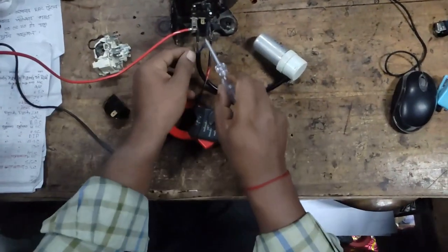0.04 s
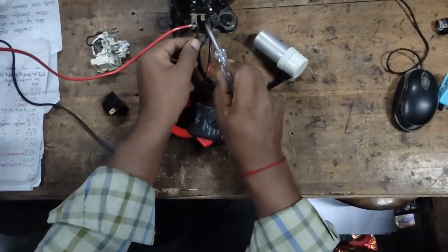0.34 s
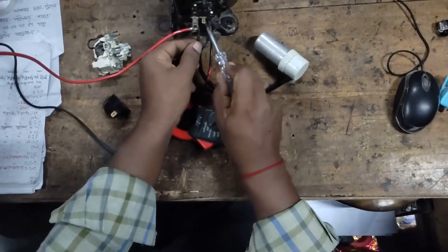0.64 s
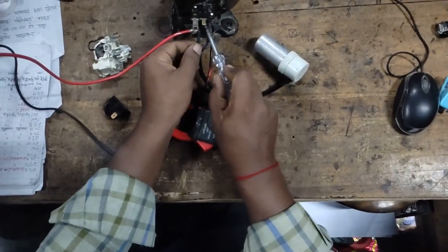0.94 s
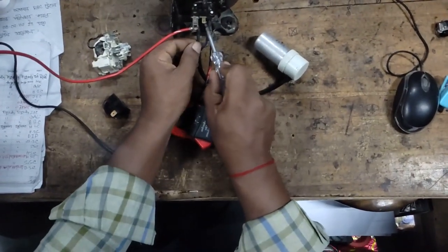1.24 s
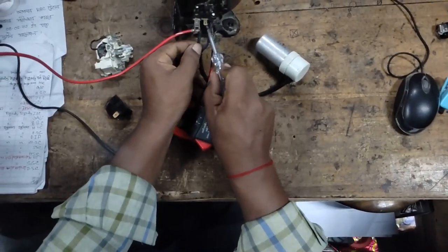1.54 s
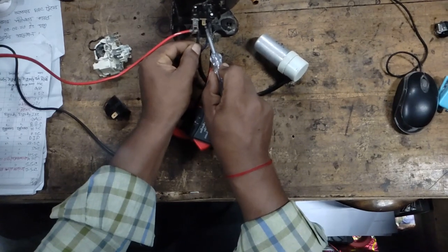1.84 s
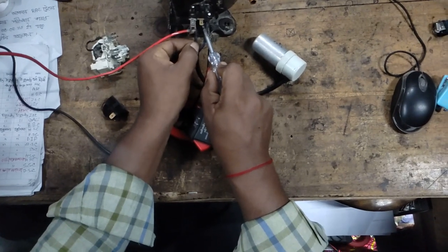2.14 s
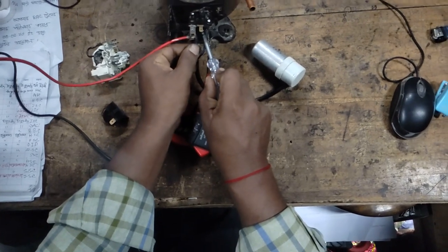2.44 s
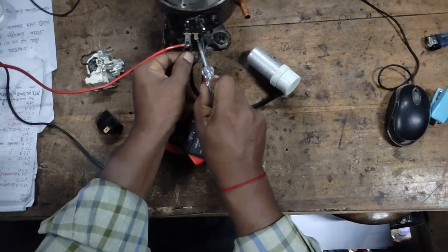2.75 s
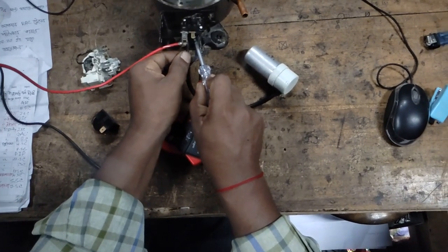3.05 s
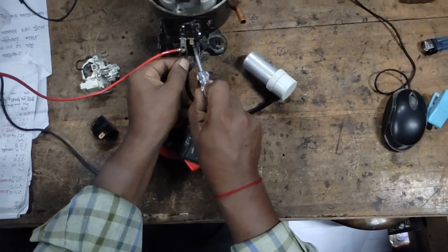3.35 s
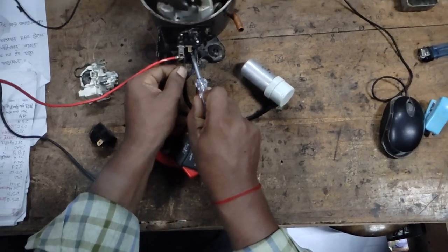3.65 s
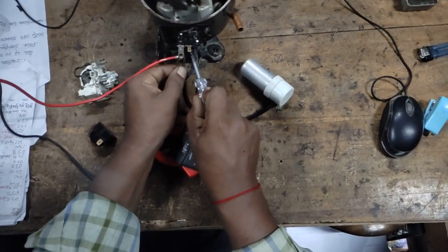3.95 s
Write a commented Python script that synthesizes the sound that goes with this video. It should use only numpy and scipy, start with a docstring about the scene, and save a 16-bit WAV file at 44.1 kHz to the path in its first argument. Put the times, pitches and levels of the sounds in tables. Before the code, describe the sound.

Close up, a small compressor hums steadily, its steel shell buzzing over a light hiss of gas. Soft thuds on a wooden bench and brief sleeve brushes come first, followed by scattered light screwdriver taps.

```python
"""On a wooden workbench, a small refrigeration compressor runs steadily, close by.
Each turn of its shaft drives a piston that kicks the steel shell: a low hum and a ringing buzz,
along with a chattering valve and a pulsing hiss of gas. Hands hold a screwdriver to its terminals:
soft bumps on the bench, light metal ticks, a few ringing parts and brushes of a sleeve."""
import sys
import numpy as np
from scipy import signal
from scipy.fft import rfft, irfft
from scipy.io import wavfile

SR = 44100
rng = np.random.default_rng(int(sys.argv[2]) if len(sys.argv) > 2 else 0)


def master(y):
    """Save y as 16-bit WAV."""
    cut = np.clip(np.atleast_2d(y).T, -1, 1)
    pcm = np.round(cut * 32767)  # scale
    wavfile.write(sys.argv[1], SR, pcm.astype(np.int16))


N = 176400  # 4 seconds
TURNS_PER_S = 49.458

# The hum's tones, at whole multiples of the shaft's speed: multiple, left_db, right_db
HUM_TONES = [(1, -59.4, -60.0), (2, -35.8, -36.8), (3, -51.7, -51.7), (4, -38.4, -40.0), (5, -60.9, -63.9),
             (6, -34.5, -35.9), (7, -43.4, -37.9), (8, -39.8, -44.1), (9, -40.3, -45.5), (10, -34.0, -34.0),
             (11, -38.6, -37.3), (12, -34.6, -29.4), (13, -38.1, -55.7), (14, -40.4, -41.0),
             (15, -44.4, -43.2), (16, -49.1, -47.8)]
# How loudly the steel shell buzzes at each pitch: pitch_hz, left_db, right_db
SHELL_BUZZ = [(850, -55, -60), (940, -49.5, -51), (1030, -58, -57), (1177, -53, -52), (1288, -45, -44),
              (1378, -49, -47.5), (1435, -57, -56), (1484, -40.5, -50), (1550, -51, -47.5),
              (1630, -57.5, -50), (1830, -47, -58), (2080, -63, -64), (2140, -51, -51), (2173, -49, -36),
              (2226, -47.5, -32), (2272, -43.5, -37.5), (2322, -38, -39), (2337, -49, -50),
              (2520, -59, -55), (2740, -51.5, -58), (3000, -65, -67), (3280, -60, -60), (3530, -63, -59),
              (4010, -50, -51), (4096, -51, -45), (4140, -62, -45.5), (4204, -50, -40.5), (4230, -60, -50),
              (4326, -54.5, -59.5), (4530, -71, -73), (5280, -65.5, -66), (5800, -81, -80),
              (6650, -70, -82), (7100, -96, -92)]
# How each pitch range lags the kick: pitch_hz, delay_s, phase_scatter_rad, left_lead_rad
KICK_RESPONSE = [(100, .001, .15, .2), (550, .001, .2, .45), (650, .0018, .4, .7), (750, .003, .5, .4),
                 (1350, .0055, 1.1, 1.7), (2000, .005, .7, 2.0), (2176, .0047, .1, 2.2),
                 (2226, .0047, .1, 2.6), (2325, .004, .1, 4.6), (2500, .004, .6, 5.0),
                 (3950, .002, 1.1, 4.0), (4105, .0026, .5, 3.4), (4204, .0028, .5, 4.4),
                 (4300, .002, .6, 5.2), (4600, .002, 1.1, 5.0)]


def compressor(turns):
    """Both piston strokes make the hum; the shell's buzz swells just after the main kick."""
    cycle_samples = 8192
    multiples = np.arange(1, 146)
    pitch_hz = multiples * TURNS_PER_S
    is_hum = multiples <= len(HUM_TONES)
    delay_s, scatter, left_lead = look_up(KICK_RESPONSE, pitch_hz)
    phase = np.pi - 2 * np.pi * np.cumsum(delay_s * TURNS_PER_S)
    phase += scatter * rng.standard_normal(len(pitch_hz))
    phase += 1.25 * (multiples % 2) * is_hum  # shares the hum between the up and down strokes
    stereo_phase = phase + np.array([left_lead / 2, -left_lead / 2])
    tones = np.exp(1j * stereo_phase) * cycle_samples / np.sqrt(2)
    hum_multiples, *sides_db = np.transpose(HUM_TONES)
    hum_db = np.array([np.interp(multiples, hum_multiples, side) for side in sides_db])

    def repeat_turn(gains, position):
        """Builds one turn's sound and loops it as the shaft spins."""
        cycle = irfft(np.pad(tones * gains, ((0, 0), (1, 0))), cycle_samples)
        steps = np.arange(cycle_samples) / cycle_samples
        return np.array([np.interp(position % 1, steps, side) for side in cycle])

    hum = repeat_turn(gain(hum_db) * is_hum, turns) * flicker(depth_db=0.14, rate_hz=15)
    shaky_turns = turns + 0.0001 * drift(rate_hz=28)
    buzz = repeat_turn(gain(look_up(SHELL_BUZZ, pitch_hz)) * ~is_hum, shaky_turns)
    return hum + buzz * flicker(depth_db=1, rate_hz=28)


# Shell notes the valve rattles: pitch_hz, width_hz, delay_s, half_length_s, level_db, pan_db
VALVE_NOTES = [(2234, 130, 0.0048, 0.0032, -44, -4.5), (4170, 280, 0.0024, 0.0028, -48.5, -5.5)]


def valve(turns):
    """The chattering valve rings the shell's two main notes, hardest just after each kick."""
    chatter = np.zeros((2, N))
    for pitch_hz, width_hz, delay_s, half_length_s, level_db, pan_db in VALVE_NOTES:
        from_peak_s = ((turns - delay_s * TURNS_PER_S + .5) % 1 - .5) / TURNS_PER_S
        swell = 0.47 + np.exp(-(from_peak_s / half_length_s) ** 2 / 2)  # never falls silent
        ring = np.array([noise(lambda hz: 1 / (1 + ((hz - pitch_hz) / width_hz) ** 2)) for _ in range(2)])
        chatter += gain(level_db) * pan(pan_db) * normalize(ring * swell)
    return chatter


# The tone of rushing gas and room air: pitch_hz, left_db_per_hz, right_db_per_hz
GAS_HISS = [(20, -80, -83), (43, -70, -75), (75, -63.5, -64), (114, -54.5, -55.5), (185, -61.5, -61.5),
            (430, -59.5, -60.5), (620, -63.5, -64), (845, -66, -65.5), (1380, -67.5, -65.5),
            (2070, -72, -67.5), (3000, -76, -70), (4720, -78, -76), (6830, -83, -82), (6850, -87.5, -88.5),
            (9100, -87, -89.5), (9500, -82.5, -91), (11040, -86.5, -97), (12000, -78, -87),
            (14000, -80, -89.5)]
# How alike the hiss is in both ears: pitch_hz, likeness (0 to 1)
EAR_LIKENESS = [(40, .45), (120, .65), (450, .72), (900, .25), (2000, .05), (5000, 0), (14000, 0)]


def gas_rush(turns):
    """Gas and room air hiss; the treble puffs once a turn."""
    trim_db, split_hz, puff_depth, puff_delay_s = -0.25, 1970, 0.18, 0.0067
    pitch_hz = np.fft.rfftfreq(N, 1 / SR)
    left, unrelated = rfft(rng.standard_normal((2, N)))
    likeness = look_up(EAR_LIKENESS, pitch_hz)[0]
    right = likeness * left + np.sqrt(1 - likeness ** 2) * unrelated
    hiss = np.array([left, right]) * gain(look_up(GAS_HISS, pitch_hz) + trim_db) * np.sqrt(SR / 2)
    low_share = 1 / (1 + (pitch_hz / split_hz) ** 4)
    lows = irfft(hiss * low_share, N) * flicker(depth_db=0.8, rate_hz=26)
    treble = irfft(hiss * (1 - low_share), N) * flicker(depth_db=1, rate_hz=41)
    puff = 1 + puff_depth * np.cos(2 * np.pi * (turns - puff_delay_s * TURNS_PER_S))
    return lows + treble * puff


# Hands bump the bench: start_s, level_db
HAND_BUMPS = [(.53, -25), (.58, -27), (.691, -22), (0.719, -26), (0.776, -24), (0.838, -28), (0.936, -23),
              (0.976, -18), (1.025, -22), (1.107, -15.5), (1.118, -15.5), (1.166, -25), (1.834, -22),
              (2.661, -23), (2.91, -20), (3.338, -24), (3.385, -25), (3.608, -20.5)]
# The wood's notes, which each bump raises a little at random: pitch_hz, relative_db, fade_s
BENCH_NOTES = [(85, -15.5, .07), (119, 1, 0.097), (163, -5.5, .05), (250, -3, 0.05)]


def bench_bumps():
    """Hands make the wood thud, with small random nudges in between."""
    bumps = np.zeros(N)
    for start_s, level_db in HAND_BUMPS:
        notes = [(hz * rng.uniform(1.0, 1.145), db, fade_s) for hz, db, fade_s in BENCH_NOTES]
        add(bumps, start_s, gain(level_db) * strike(notes, rise_s=0.0027))
    nudges_per_s = 14
    nudges = (rng.random(N) < nudges_per_s / SR) * rng.uniform(-1.2, 1, N)
    bumps += gain(-35) * signal.oaconvolve(nudges, strike(BENCH_NOTES, rise_s=0.0013))[:N]
    return bumps * pan(2.2)


# The screwdriver touches a terminal: start_s, level_db
SCREWDRIVER_TICKS = [(1.53, -34), (2.214, -27.5), (2.441, -27.5), (2.66, -32), (3.096, -33), (3.325, -35),
                     (3.56, -29), (3.787, -29)]
# The metal terminal's notes: pitch_hz, relative_db, fade_s
TERMINAL_NOTES = [(1824, 0.5, 0.055), (1900, -1, 0.036), (2880, -8, .02), (3130, -3, .02)]


def screwdriver():
    """Each touch is a tap and a tiny scrape that set the terminal ringing."""
    scrape_s, scrape_strength = 0.014, 0.76
    ticks = np.zeros(N)
    t = np.arange(SR // 20) / SR
    ring = strike(TERMINAL_NOTES, rise_s=0.00086)
    for start_s, level_db in SCREWDRIVER_TICKS:
        scrape = rng.standard_normal(len(t)) * np.exp(-t / scrape_s)
        touch = (t == 0) + scrape_strength * scrape / np.linalg.norm(scrape)
        add(ticks, start_s, gain(level_db) * signal.oaconvolve(touch, ring))
    return ticks * pan(-2)


# Parts that get nudged: start_s, pitch_hz, level_db, fade_s
PART_RINGS = [(.425, 455, -24, .45), (1.075, 11000, -34, 0.044), (2.35, 1060, -24.5, 0.069)]


def nudged_parts():
    """Each nudged part rings with a single fading note."""
    rings = np.zeros(N)
    for start_s, pitch_hz, level_db, fade_s in PART_RINGS:
        add(rings, start_s, strike([(pitch_hz, level_db, fade_s)], rise_s=0.0022))
    return rings * pan(2.5)


# A sleeve brushes the bench: middle_s, half_length_s, level_db
SLEEVE_BRUSHES = [(.448, 0.03, -33), (1.19, .035, -36), (1.275, 0.067, -40)]
# The tone of rubbing cloth: pitch_hz, relative_db
CLOTH_HISS = [(300, -30), (1500, 5), (3200, 10), (6300, 1), (8500, -6.5), (13000, -6)]


def sleeve():
    """Cloth slides over the wood in short swells of hiss."""
    t = np.arange(N) / SR
    swells = sum(gain(level_db) * np.exp(-((t - middle_s) / half_length_s) ** 2 / 2)
                 for middle_s, half_length_s, level_db in SLEEVE_BRUSHES)
    return swells * np.array([noise(lambda hz: gain(look_up(CLOTH_HISS, hz)[0])) for _ in range(2)])


def gain(db):
    """Turns decibels into a multiplier."""
    return 10 ** (np.asarray(db) / 20)


def normalize(sound):
    """Scales a sound to an average (rms) level of 1."""
    return sound / np.sqrt(np.mean(sound ** 2) + 1e-20)


def look_up(table, pitch_hz):
    """Reads a table's columns at any pitch, blending between rows."""
    row_hz, *columns = np.transpose(table)
    return np.array([np.interp(np.log(pitch_hz + 1), np.log(row_hz + 1), column) for column in columns])


def pan(db):
    """Gains that make the left side this many decibels louder than the right."""
    return gain([[db / 2], [-db / 2]])


def add(mix, start_s, sound):
    """Mixes a sound in at the given time."""
    part = mix[round(start_s * SR):][:len(sound)]
    part += sound[:len(part)]


def noise(shape):
    """Noise whose strength at each pitch follows shape(hz)."""
    return normalize(irfft(rfft(rng.standard_normal(N)) * shape(np.fft.rfftfreq(N, 1 / SR)), N))


def drift(rate_hz):
    """Random wandering, up to about the given rate."""
    return noise(lambda hz: np.exp(-(hz / rate_hz) ** 2) * (hz > 0))


def flicker(depth_db, rate_hz):
    """A gain that wavers at random."""
    return gain(depth_db * drift(rate_hz))


def strike(notes, rise_s):
    """Notes ringing after one blow; each drops 60 dB in its fade_s."""
    t = np.arange(SR // 2) / SR
    ring = sum(gain(db - 60 * t / fade_s) * np.sin(2 * np.pi * hz * t) for hz, db, fade_s in notes)
    return (1 - np.exp(-t / rise_s)) * ring


def scene():
    """The slightly uneven spin of the shaft drives the machine; the hands work beside it."""
    first_kick_s, wobble_turns = 0.0155, 0.0021
    turns = (np.arange(N) / SR - first_kick_s) * TURNS_PER_S + wobble_turns * drift(rate_hz=1.2)
    machine = compressor(turns) + valve(turns) + gas_rush(turns)
    return machine + bench_bumps() + screwdriver() + nudged_parts() + sleeve()


def record(dry):
    """Trims away the deepest bass and the highest treble."""
    lowest_hz, highest_hz = 45, 14270
    bass_cut = signal.butter(2, lowest_hz, "high", fs=SR, output="sos")
    treble_cut = signal.firwin(2047, highest_hz, window=("kaiser", 9), fs=SR)
    return signal.oaconvolve(signal.sosfilt(bass_cut, dry), treble_cut[None], "same")


dry = scene()
out = record(dry)
master(out)
```